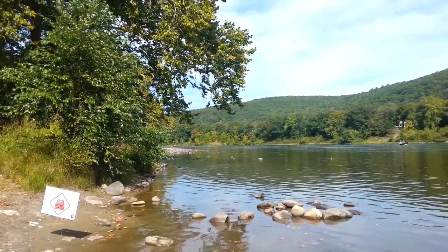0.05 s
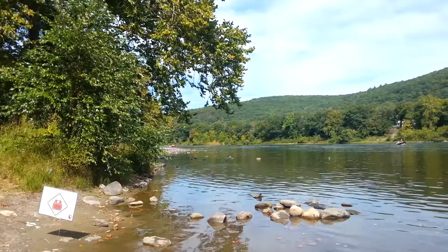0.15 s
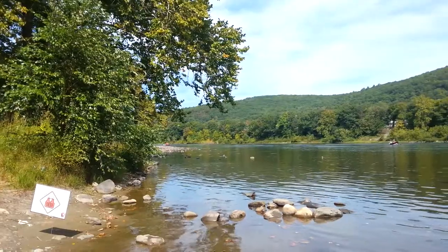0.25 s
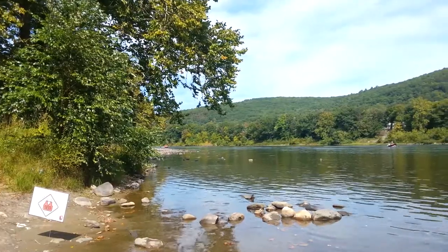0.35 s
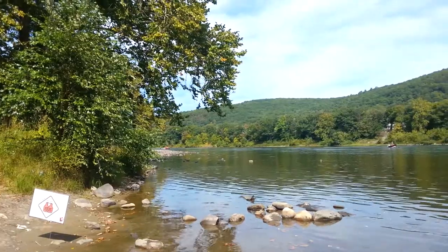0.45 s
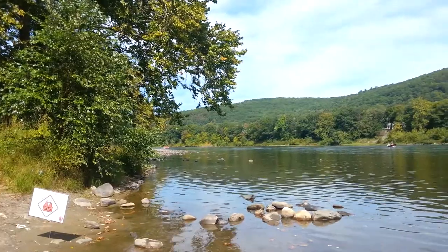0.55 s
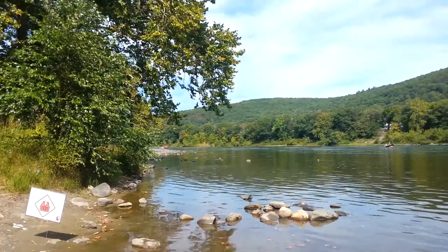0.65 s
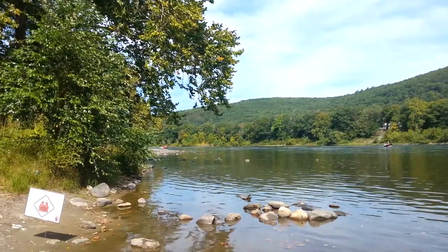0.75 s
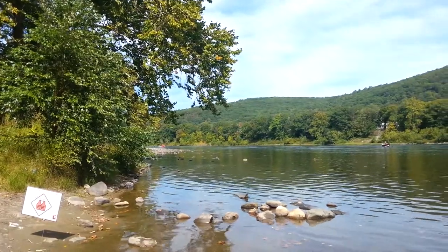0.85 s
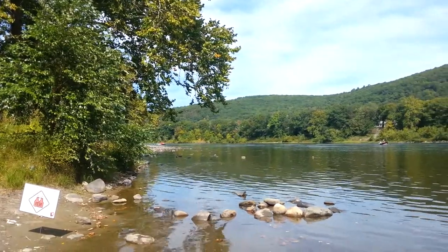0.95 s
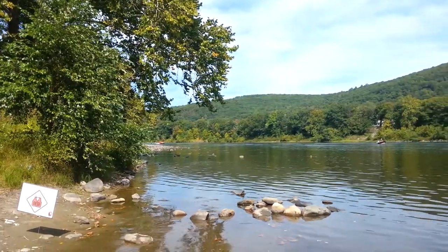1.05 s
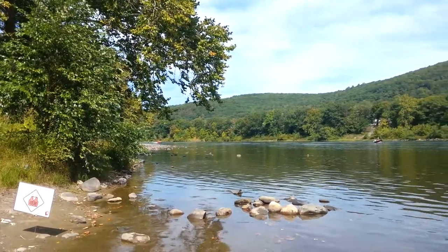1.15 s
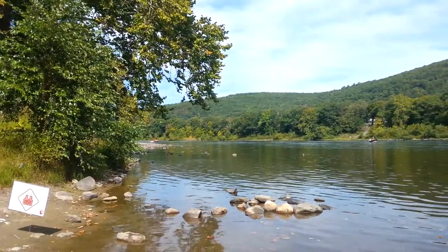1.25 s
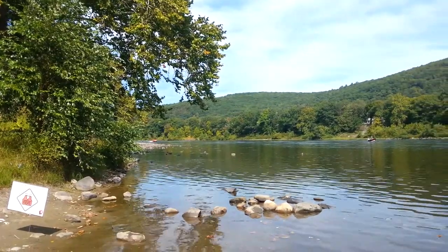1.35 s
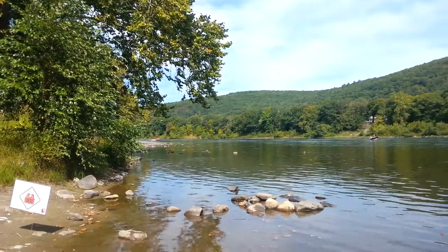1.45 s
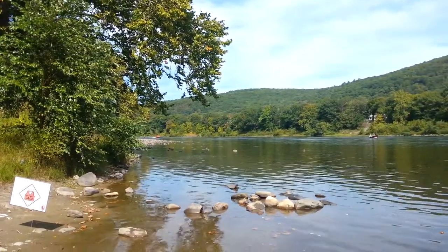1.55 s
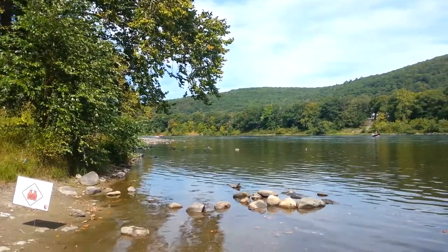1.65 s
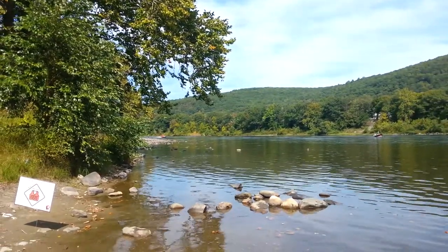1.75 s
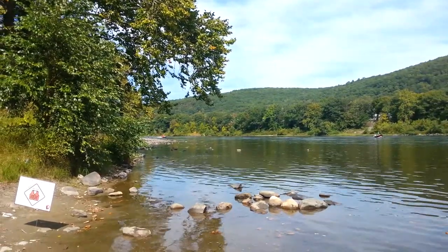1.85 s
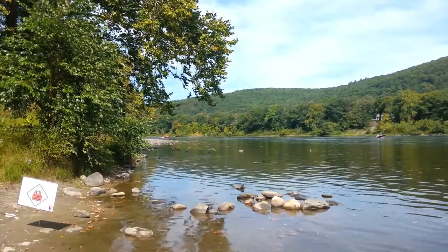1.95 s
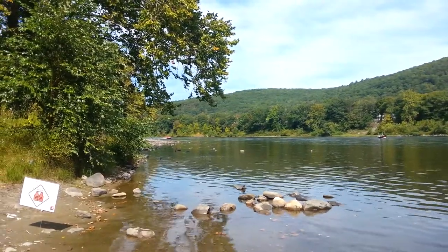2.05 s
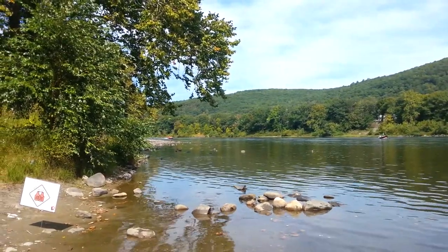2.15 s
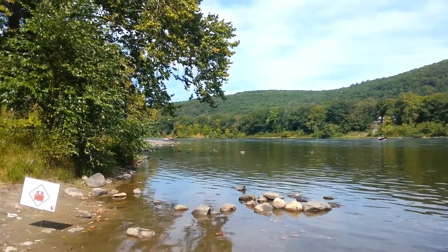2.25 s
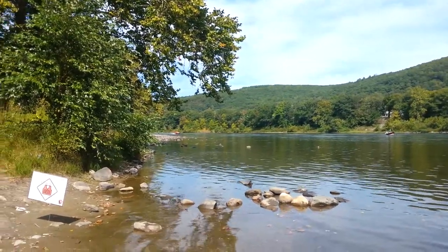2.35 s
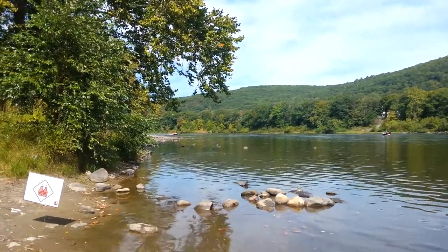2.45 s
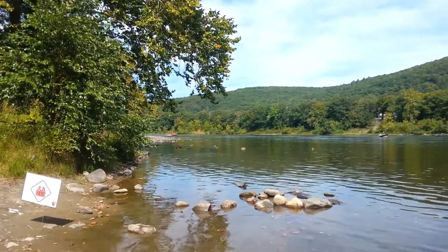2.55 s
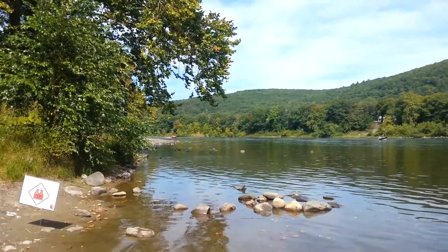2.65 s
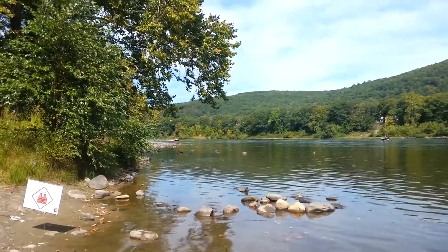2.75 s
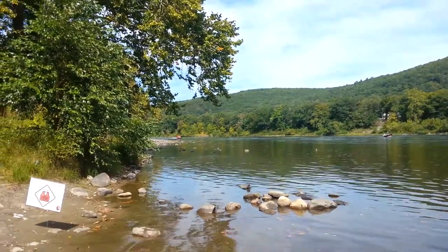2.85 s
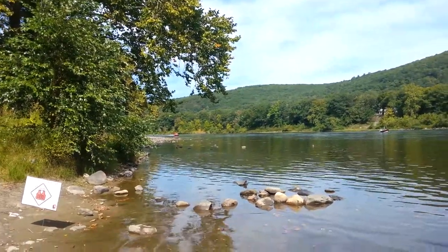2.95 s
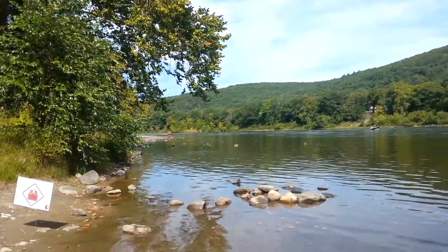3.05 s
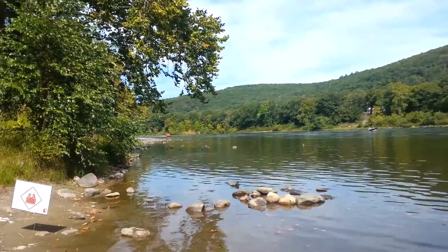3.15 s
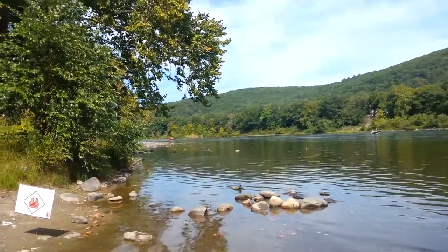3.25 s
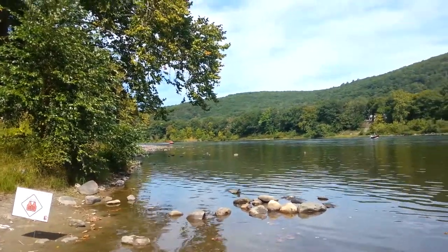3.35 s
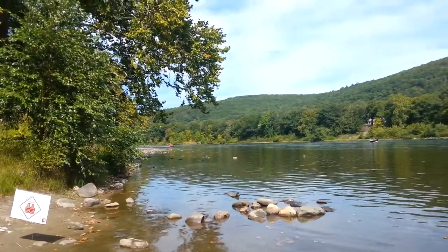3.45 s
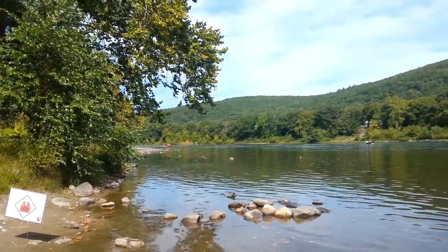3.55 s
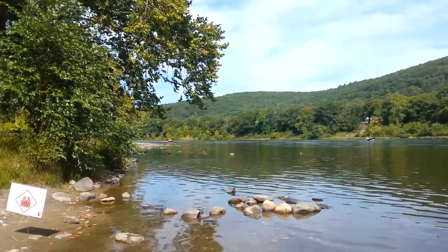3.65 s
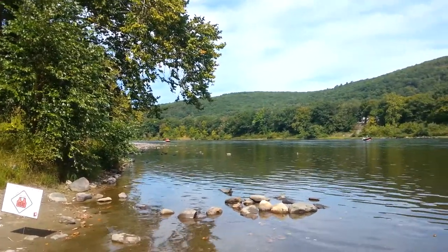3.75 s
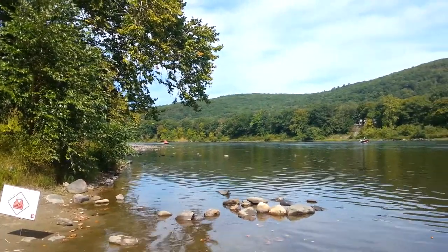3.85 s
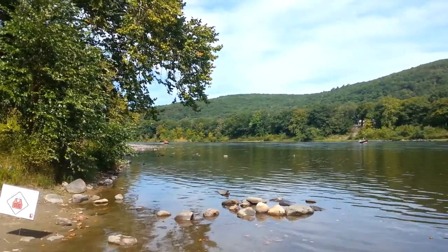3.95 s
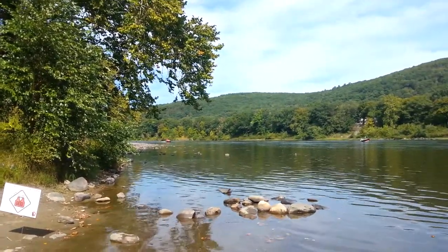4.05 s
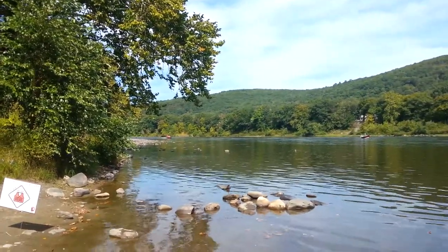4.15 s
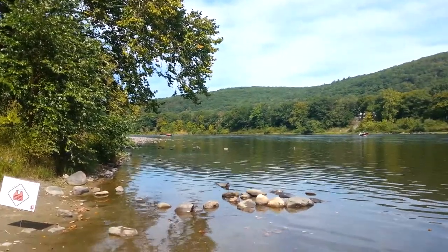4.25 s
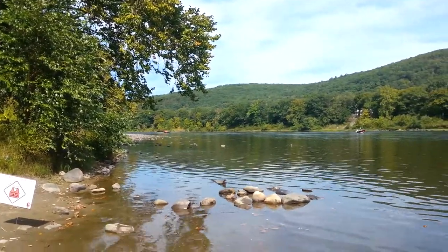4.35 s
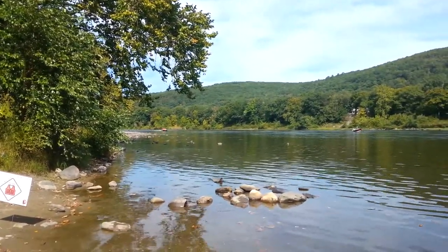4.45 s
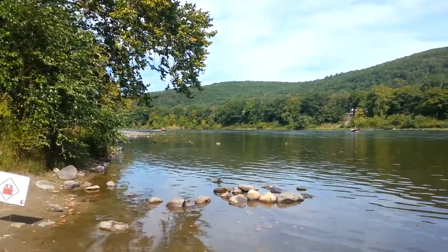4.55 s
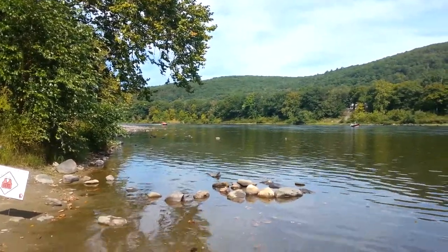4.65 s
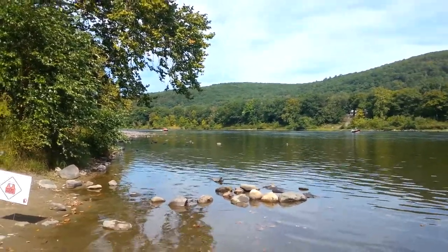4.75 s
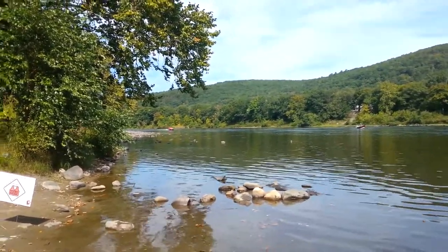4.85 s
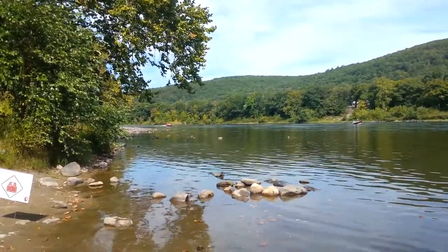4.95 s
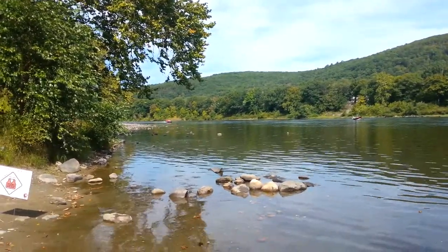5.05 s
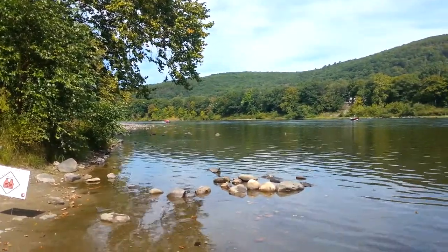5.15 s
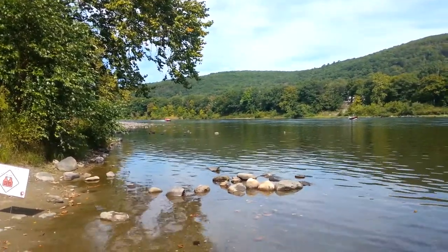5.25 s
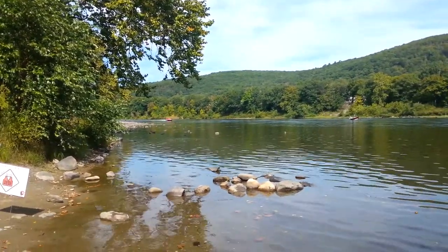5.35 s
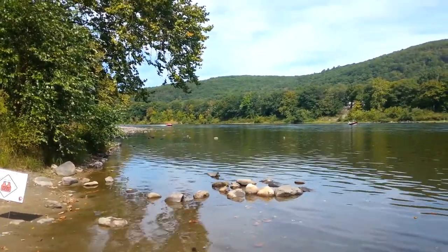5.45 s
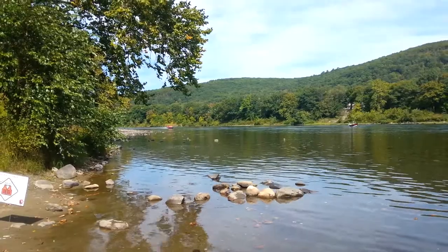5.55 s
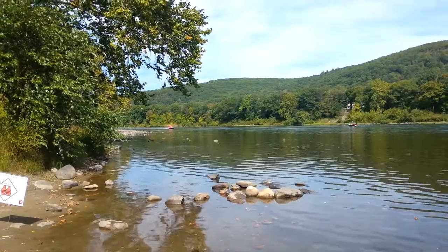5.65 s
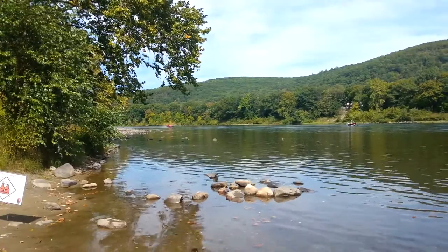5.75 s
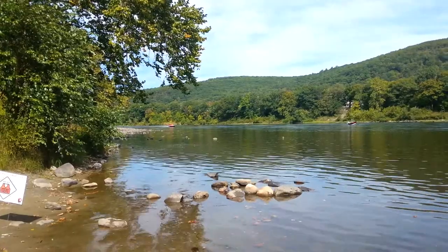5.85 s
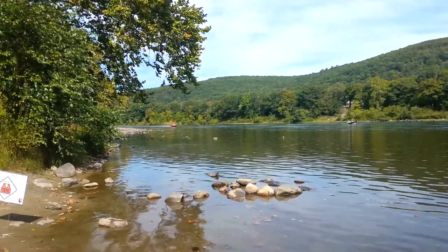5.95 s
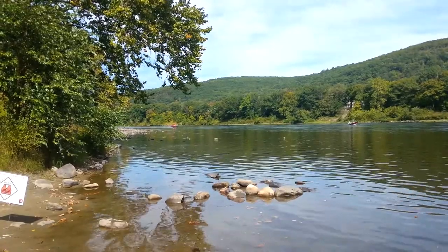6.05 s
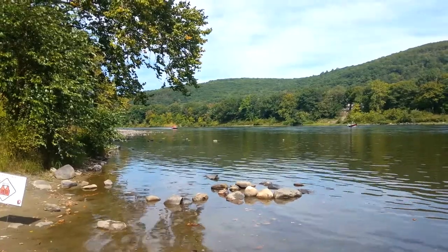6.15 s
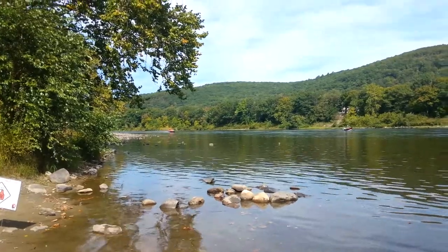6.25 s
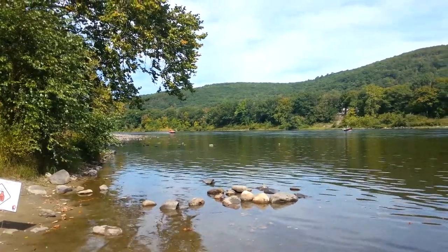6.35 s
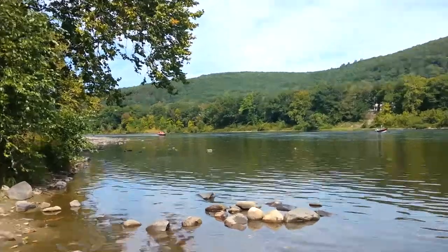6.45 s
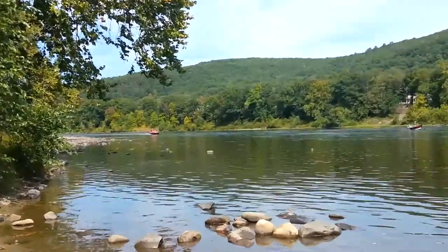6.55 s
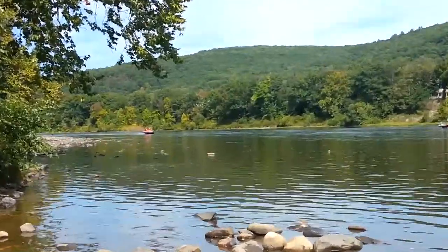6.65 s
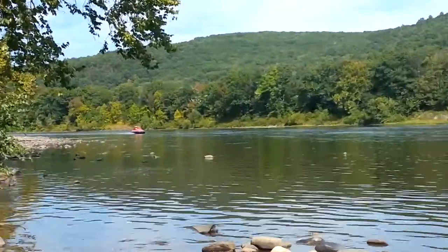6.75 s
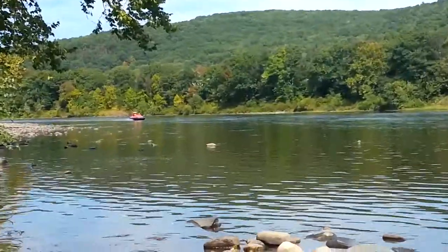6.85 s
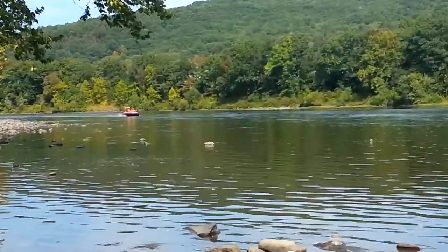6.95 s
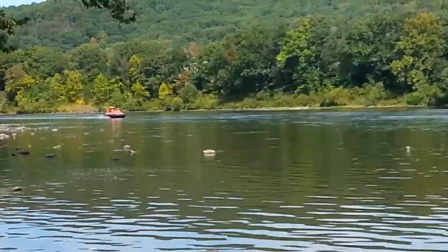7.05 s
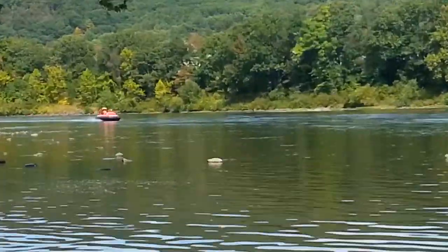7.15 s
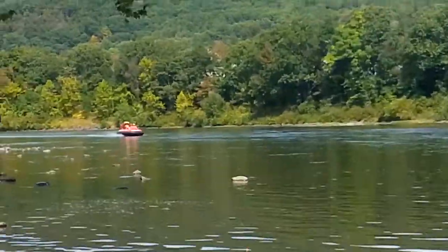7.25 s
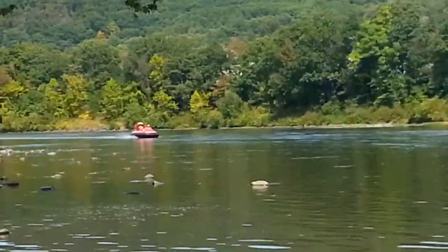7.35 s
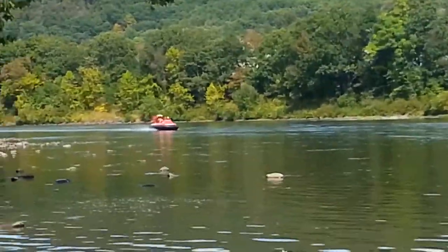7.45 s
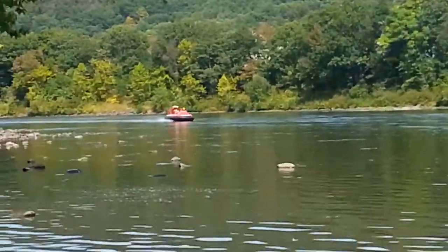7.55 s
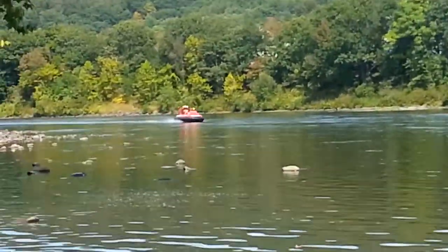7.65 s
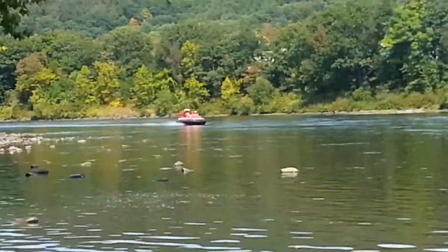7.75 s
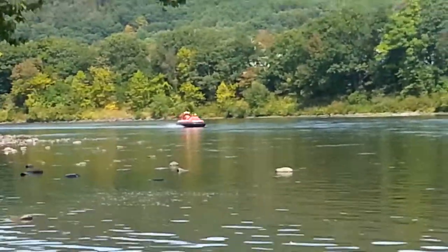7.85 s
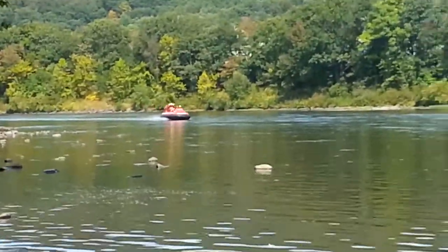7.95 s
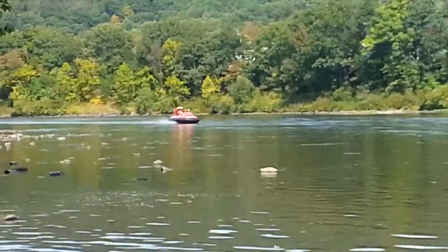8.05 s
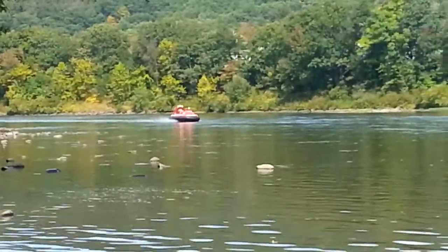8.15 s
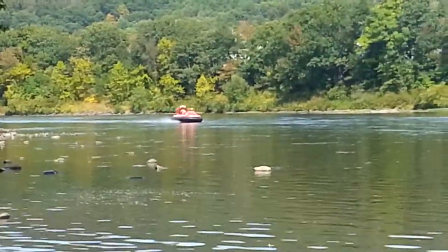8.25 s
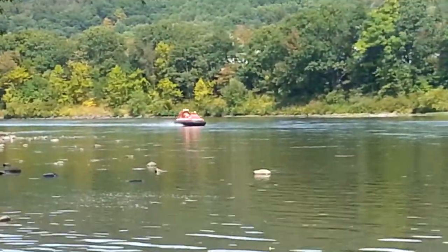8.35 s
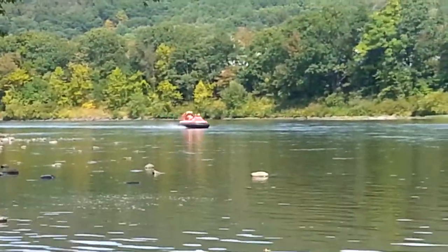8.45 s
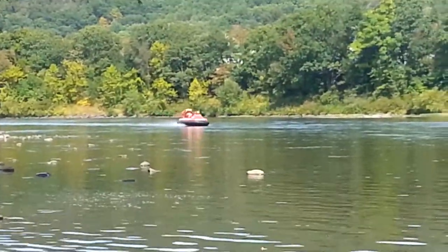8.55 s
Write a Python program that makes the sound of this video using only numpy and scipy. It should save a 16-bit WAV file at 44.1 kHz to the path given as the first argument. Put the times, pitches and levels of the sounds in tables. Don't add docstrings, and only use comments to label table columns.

```python
import sys
import numpy as np
from scipy import signal
from scipy.fft import rfft, irfft, next_fast_len
from scipy.io import wavfile
from scipy.ndimage import uniform_filter1d, map_coordinates

SR = 44100
rng = np.random.default_rng(int(sys.argv[2]) if len(sys.argv) > 2 else 0)


def int16_out(signal):
    q = np.round(np.clip(np.atleast_2d(signal).T, -1, 1) * 32767)
    wavfile.write(sys.argv[1], SR, q.astype(np.int16))


def voltage_ratio(decibels):
    exponent = np.asarray(decibels, float) / 20
    return 10 ** exponent


N = 378378


def unit(x):
    return x / np.sqrt(np.mean(x ** 2) + 1e-20)


def curves(rows):
    s, *columns = np.transpose(rows)
    return [np.interp(np.arange(N) / SR, s, column) for column in columns]


def wobble(rate_hz):
    knots = rng.standard_normal(int(N * rate_hz / SR) + 4)
    return map_coordinates(knots, [np.arange(N) * rate_hz / SR])


def bumps(rows):
    t = np.arange(N) / SR
    return sum((db * np.exp(-((t - s) / half_s) ** 2) for s, half_s, db in rows), 0 * t)


def coloured(x, spectrum):
    size = next_fast_len(N + 8192)
    hz, db = np.transpose(spectrum)
    log_hz = np.log(np.fft.rfftfreq(size, 1 / SR) + 1)
    gain = voltage_ratio(np.interp(log_hz, np.log(hz + 1), db, left=-120))
    return unit(irfft(rfft(x, size) * gain, size)[:N])


def patchy(patchy_db, wide_bins, long_frames):
    z = signal.stft(rng.standard_normal(N + 512), nperseg=512)[2]
    field = rng.standard_normal(z.shape)
    for _ in range(2):
        field = uniform_filter1d(field, wide_bins, 0)
        field = uniform_filter1d(field, long_frames, 1)
    return signal.istft(z * voltage_ratio(patchy_db * unit(field)), nperseg=512)[1][:N]


# (time [s], share [0-1])
OPENNESS = [(0, 0.18), (1.7, 0), (2.4, 0.41), (4.1, .56), (4.8, 0.8), (6.5, 0.88), (8.58, 0.82)]


def open_share():
    return np.clip(curves(OPENNESS)[0], 0, 1)


def turning(x, far, bend, near):
    share = open_share()
    weights = [np.clip(1 - np.abs(2 * share - k), 0, 1) for k in range(3)]
    return sum(w * coloured(x, colour) for w, colour in zip(weights, (far, bend, near)))


# (time [s], level [dB])
LOUDNESS = [(0, -31.5), (.6, -30.5), (1.77, -25.5), (2.05, -24), (2.29, -20), (2.56, -20.5), (2.87, -17),
            (2.99, -14), (3.18, -18), (3.39, -22), (3.53, -17), (4.13, -13.5), (4.28, -18), (4.45, -15),
            (5.5, -14.5), (7.0, -13.5), (8.3, -14), (8.58, -16)]
PARTS = {"rumble": (-30.5, 1, 0.88, -30), "roar": (-16, 0.92, -0.06, -46), "wash": (-22, 1.33, 1.02, -31),
         "hiss": (-36, 1.3, 1.83, -43.5), "spray": (-52, 0.7, 0.14, -67.5),
         "blade": (-29, 0.5, 0.94, -34.5), "octave": (-23, 0.9, -.1, -64.5),
         "whine": (-51.5, -0.1, 1.43, -72), "intake": (-23, 1.3, -0.96, -44)}
SWELLS = {"octave": [(0, 0.78, -7.5), (6, 0.55, 2.5), (2, .25, 1)], "blade": [(2.9, .3, 1.5),
          (4.55, .35, -4), (7.8, .4, 0)], "whine": [(.25, .2, -1.5), (4.8, .2, 7), (5.35, .15, -1),
          (6.75, .3, 4), (2.25, 0.11, 4), (2.8, .18, 7), (7.7, .4, 9.5)], "intake": [(1.3, .55, -4),
          (4.7, .45, -3), (6.1, .5, -17), (7.6, .4, -25), (8.55, .15, -15)], "wash": [(.85, 0.39, 1),
          (5.5, 0.49, -1), (6.5, 0.31, 0)], "hiss": [(.32, 0.27, 3), (4.75, 0.27, 2.5), (7.3, 0.12, 1),
          (8.5, 0.36, -3)], "spray": [(2.7, 0.47, 4), (4.8, .3, -3), (6.45, 0.23, -2.5), (7.93, 0.75, 5.5)],
          "rumble": [(6.55, 0.28, 1.5)], "roar": []}


def level(part):
    full_level_db, growth, slope_db_per_s, echo_db = PARTS[part]
    above_full_db = curves(LOUDNESS)[0] + 15
    since_full_s = np.arange(N) / SR - 4
    direct_db = full_level_db + growth * above_full_db + slope_db_per_s * since_full_s
    return 10 * np.log10(voltage_ratio(direct_db) ** 2 + voltage_ratio(echo_db) ** 2) + bumps(SWELLS[part])


# (time [s], lift [dB])
FLARES = [(2.15, 9), (2.32, 4.5), (2.51, 5), (2.64, 6.5), (2.75, 7), (2.94, 5), (3.13, 2.5), (3.63, 6),
          (3.85, 2.5), (4.43, 4), (4.59, 2.5), (4.73, 1.5), (4.92, 1.5), (5.8, 3), (7.22, -1.5), (7.48, 3)]


def flares():
    return bumps([(s, 0.016, db) for s, db in FLARES])


def shimmer():
    return 1.08 * wobble(16)


def drift():
    return .6 * wobble(5)


def tone(turns, db, flutter_db, blur_rad):
    gain = np.sqrt(2) * voltage_ratio(db + flutter_db * wobble(14))
    return gain * np.sin(2 * np.pi * turns + blur_rad * wobble(9))


# (frequency [Hz], density [dB per Hz])
VALLEY_AIR = [(13, -53.5), (22, -21.5), (43, -26.5), (75, -4), (140, 1.5), (180, -31.5), (310, -120)]
# (frequency [Hz], density [dB per Hz])
SELF_HISS = [(5000, -30), (8000, 0), (11000, 0), (14600, -1), (15200, -40)]


def valley():
    low = voltage_ratio(-49.5) * coloured(patchy(.8, 2, 8), VALLEY_AIR)
    return low + voltage_ratio(-60) * coloured(patchy(1.5, 3, 4), SELF_HISS)


# (time [s], peak level [dB], lowest frequency [Hz])
TICKS = [
    (3.0700, -26, 4800),
    (3.0822, -11, 4800),
    (4.1887, -18, 6000),
    (4.5726, -12, 3600),
    (4.5800, -38, 7500),
]


def ticks():
    out, push = np.zeros(N + 400), np.arange(400) == 0
    for s, db, low_hz in TICKS:
        snap = signal.sosfilt(signal.cheby1(5, 2, low_hz, "high", fs=SR, output="sos"), push)
        snap = signal.sosfilt(signal.butter(1, 3500, fs=SR, output="sos"), snap)
        snap += 3 * signal.lfilter(*signal.iirpeak(1.15 * low_hz, 4, SR), snap)
        snap = signal.sosfilt(signal.butter(6, 12800, fs=SR, output="sos"), snap)
        out[round(s * SR):][:400] += voltage_ratio(db) * snap / np.abs(snap).max()
    return out[:N]


# (time [s], peak level [dB], thump level [dB])
KICKS = [
    (5.6361, -52, -70),
    (5.9407, -51, -67),
    (6.924, -50, -69),
    (7.216, -49, -60),
    (7.4854, -47, -52),
]


def kicks():
    out, t = np.zeros(N + 400), np.arange(400) / SR
    for s, db, thump_db in KICKS:
        out[round((s + .001) * SR)] += voltage_ratio(db + 9)
        out[round(s * SR):][:400] += voltage_ratio(thump_db + 14) * np.sin(np.pi * t / t[-1]) ** 2
    return out[:N]


# (frequency [Hz], density [dB per Hz])
SPRAY_FAR = [(5000, -35), (5700, -0.5), (6600, 1.5), (7600, -1), (8600, -7), (9500, -9), (11000, -39)]
SPRAY_NEAR = [(5700, -41), (6200, -1.5), (6700, 0.5), (7600, -1.5), (8600, -4), (9300, -12), (10500, -40.5)]


def spray():
    return voltage_ratio(level("spray") + 2.0) * turning(patchy(1.4, 3, 12), SPRAY_FAR, SPRAY_FAR, SPRAY_NEAR)


# (frequency [Hz], density [dB per Hz])
RUMBLE = [(65, -53), (110, -25), (161, -16), (230, -1.5), (276, -7), (330, -10.5), (371, -10), (404, -10.5),
          (480, -21.5), (620, -39), (1060, -120)]


def rumble(rumble_db):
    return voltage_ratio(rumble_db) * coloured(patchy(1.2, 2, 8), RUMBLE)


# (frequency [Hz], density [dB per Hz])
ROAR_FAR = [(190, -58.5), (330, -21), (373, 2), (410, -12), (712, -6), (736, -10), (800, -5.5),
            (1250, -15.5), (1620, -49.5), (2750, -120)]
ROAR_BEND = [(190, -50), (330, -25.5), (371, -3), (406, -17.5), (712, -3), (740, 1), (1080, -9),
             (1250, -10), (1620, -45), (2750, -120)]
ROAR_NEAR = [(190, -46.5), (330, -12.5), (365, -14), (399, -15.5), (692, -2), (728, -6.5), (787, -0.5),
             (1250, -16.5), (1620, -41), (2750, -120)]


def roar(roar_db, gust_db):
    noise = turning(patchy(0.75, 3, 12), ROAR_FAR, ROAR_BEND, ROAR_NEAR)
    return voltage_ratio(roar_db - 2.0 + 0.38 * gust_db) * noise


# (frequency [Hz], density [dB per Hz])
WASH_FAR = [(620, -37), (1050, -1), (1120, -23.5), (1280, -2.5), (1640, 0.5), (1800, -6), (1950, 3.5),
            (2070, -7), (2170, -4.5), (2680, -9), (3200, -32), (4160, -57.5), (7040, -120)]
WASH_BEND = [(620, -29), (1050, -6.5), (1080, -18), (1210, -1), (1510, 3.5), (1710, -4), (1950, -4.5),
             (2250, -12), (2620, -17.5), (3200, -37), (4160, -55.5), (7040, -120)]
WASH_NEAR = [(620, -18.5), (1050, -1), (1110, -6.5), (1310, -1.5), (1520, 1), (1750, -6.5), (2070, -4),
             (2310, -17.5), (2530, -8), (2830, -26.5), (3200, -23), (4160, -56), (7040, -120)]


def wash(wash_db, gust_db):
    noise = turning(patchy(1.2, 2, 60), WASH_FAR, WASH_BEND, WASH_NEAR)
    return voltage_ratio(wash_db + 0.46 * gust_db) * noise


# (frequency [Hz], density [dB per Hz])
HISS_FAR = [(1650, -38), (2800, -4.5), (2900, -1.5), (3550, -5), (3840, -0.5), (3960, -7.5), (4320, -4.5),
            (5390, -19.5), (5900, -19), (7670, -52.5), (13000, -120)]
HISS_BEND = [(1650, -31.5), (2800, -0.5), (3160, -4.5), (3370, -1.5), (3540, 0.5), (3630, -6.5),
             (4130, -0.5), (4470, -9), (5900, -10.5), (7670, -32.5), (13000, -120)]
HISS_NEAR = [(1650, -31), (2800, -4.5), (3110, -9), (3580, 0.5), (4290, 4.5), (4670, 0), (5300, -4.5),
             (5500, -23), (5850, -21.5), (6150, -39), (8000, -120)]


def hiss(hiss_db, gust_db):
    noise = turning(patchy(1.2, 2, 50), HISS_FAR, HISS_BEND, HISS_NEAR)
    return voltage_ratio(hiss_db + 0.71 * gust_db) * noise


def air(blades, rumble_db, roar_db, wash_db, hiss_db):
    gust_db = .5 * wobble(11) + 0.8 * wobble(45)
    beat = 1 + .01 * np.cos(2 * np.pi * blades)
    low = rumble(rumble_db) + roar(roar_db, gust_db)
    return low + beat * (wash(wash_db, gust_db) + hiss(hiss_db, gust_db))


def engine(blades, rumble_db, wash_db):
    firings = blades / 4.4
    hum = tone(firings, rumble_db - 31, flutter_db=2.5, blur_rad=.4)
    intake = tone(10 * firings, level("intake") + drift() + .2, flutter_db=1.2, blur_rad=.45)
    upper = tone(16 * firings, wash_db - 14 + 1.5 * wobble(1), flutter_db=1.5, blur_rad=.5)
    return hum + intake + upper


# (blade-rate multiple, time [s], half length [s], level [dB])
WHISTLES = [(5.3, 1.0, .45, -39), (10, .45, .2, -50), (10, 1.2, .15, -52), (9, 2.9, .25, -46),
            (11.1, 3.8, .35, -44), (11.1, 4.55, .3, -40), (4.1, 4.6, .4, -30), (4.1, 2.05, .3, -36),
            (6.9, 1.6, .4, -44), (9, 2.3, .25, -49)]


def whistles(blades):
    t, blur_hz = np.arange(N) / SR, 110
    out = np.zeros(N)
    for k, s, half_s, db in WHISTLES:
        phase = 2 * np.pi * k * blades
        band = wobble(blur_hz) * np.sin(phase) + wobble(blur_hz) * np.cos(phase)
        out += voltage_ratio(db) * np.exp(-((t - s) / half_s) ** 2) * band
    return out


# (blade-rate multiple, hidden level re air [dB], open level re air [dB])
WASH_ORDERS = [(3, -24, -24), (4, -19, -21), (5, -16, -31), (6, -24, -36), (7, -27, -33)]
HISS_ORDERS = [(8, -18, -21), (9, -12, -27), (11, -16, -26), (12, -24, -28), (13, -24, -28)]


def fan(blades, wash_db, hiss_db):
    first_db, second_db, whine_db = (level(part) + drift() for part in ("blade", "octave", "whine"))
    share = open_share()
    song = tone(blades, first_db + .7, flutter_db=.7, blur_rad=.15)
    song += tone(2 * blades, second_db + .7, flutter_db=1.1, blur_rad=.3)
    song += tone(10 * blades, whine_db + 1.5, flutter_db=1.5, blur_rad=.6)
    for orders, air_db in (WASH_ORDERS, wash_db), (HISS_ORDERS, hiss_db):
        for k, far_db, near_db in orders:
            order_db = air_db + far_db + share * (near_db - far_db) + 2.5 * wobble(1.5)
            song += tone(k * blades, order_db, flutter_db=1.2, blur_rad=.4)
    return song


# (time [s], centre [Hz], depth [dB])
NOTCH = [(0, 6400, 3), (2.4, 6350, 7), (3.6, 6200, 2), (4.7, 6000, 5), (5.7, 6250, 7), (7.3, 6000, 9),
         (7.8, 6150, 11), (8.05, 6300, 10), (8.58, 6350, 10)]


def water(x, size=512):
    hz, t, z = signal.stft(x, SR, nperseg=size)
    s, notch_hz, depth_db = np.transpose(NOTCH)
    width_hz = 110
    dip = np.exp(-((hz[:, None] - np.interp(t, s, notch_hz)) / width_hz) ** 2)
    return signal.istft(z * voltage_ratio(-np.interp(t, s, depth_db) * dip), SR, nperseg=size)[1][:N]


# (time [s], blade rate [Hz])
BLADE_RATE = [(0.0, 378.0), (1.65, 379.1), (3.3, 379.7), (3.96, 378.5), (4.62, 374.7), (5.28, 374.0),
              (5.94, 371.3), (6.6, 371.1), (8.25, 369.2), (8.58, 366.5)]


def scene():
    blades = np.cumsum(curves(BLADE_RATE)[0]) / SR
    flare_db = flares()
    rumble_db = level("rumble") + .5 * flare_db + 1.1 * shimmer()
    roar_db = level("roar") + 0.78 * flare_db + 0.7 * shimmer()
    wash_db = level("wash") + 0.35 * flare_db + 0.56 * shimmer()
    hiss_db = level("hiss") + .5 * flare_db + .4 * shimmer()
    craft = air(blades, rumble_db, roar_db, wash_db, hiss_db) + spray()
    craft += engine(blades, rumble_db, wash_db) + whistles(blades)
    craft += fan(blades, wash_db, hiss_db)
    return (valley() + water(craft))[None]


def masked(x, floor_db, follow, size=2048, count=4):
    hz, _, z = signal.stft(x, SR, "cosine", size)
    density = np.abs(z) ** 2 * 1.62 * size / SR
    loud_db = uniform_filter1d(10 * np.log10(density.mean(0) + 1e-12), 5)
    bands = np.add.reduceat(density, np.arange(0, len(density), count)) / count
    keep = 10 * np.log10(bands + 1e-20) > floor_db + follow * loud_db
    keep = np.repeat(keep, count, 0)[:len(hz)] | (hz[:, None] < 5000)
    return signal.istft(z * keep, SR, "cosine", size)[1][:N]


def top_cut(x):
    return signal.sosfilt(signal.butter(12, 15700, fs=SR, output="sos"), x)


def record(dry):
    x = dry[0] / (1 + np.abs(dry[0] / .97) ** 8) ** (1 / 8)
    x = masked(x, floor_db=-35, follow=.88) + ticks() + kicks()
    x = x * np.clip((N - np.arange(N)) / (.0007 * SR), 0, 1)
    return top_cut(x[None])


dry = scene()
out = record(dry)
int16_out(out)
```